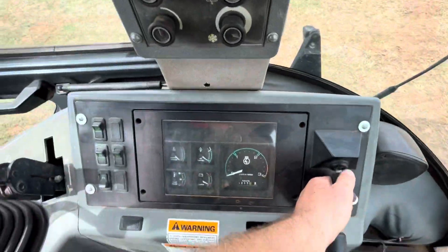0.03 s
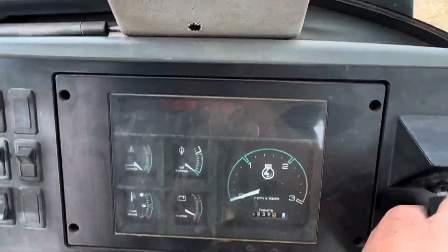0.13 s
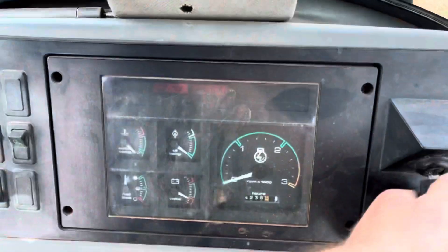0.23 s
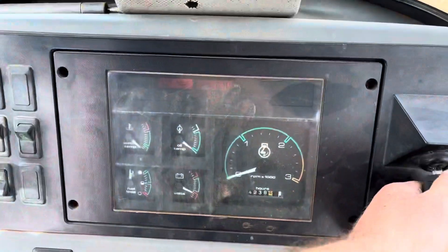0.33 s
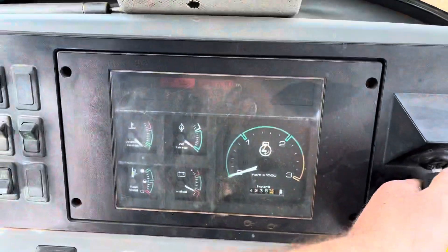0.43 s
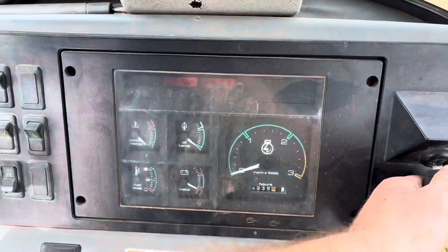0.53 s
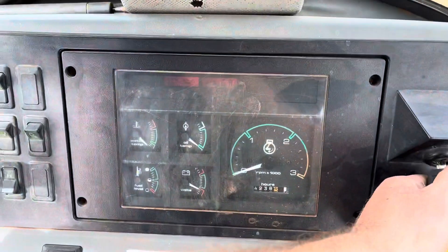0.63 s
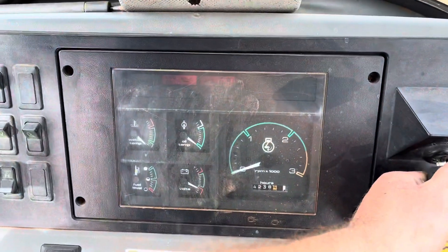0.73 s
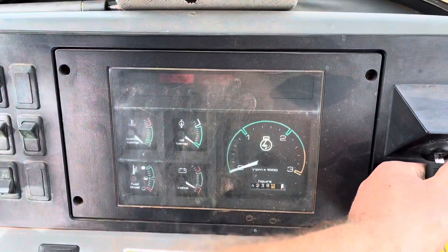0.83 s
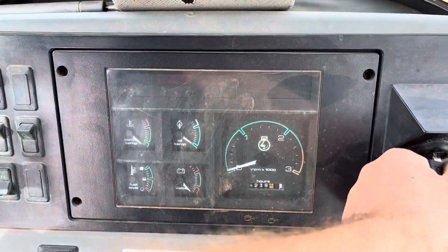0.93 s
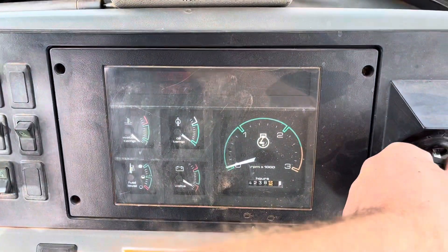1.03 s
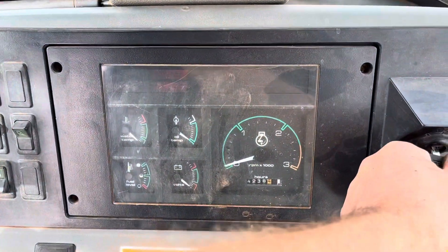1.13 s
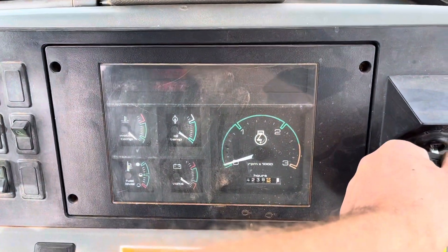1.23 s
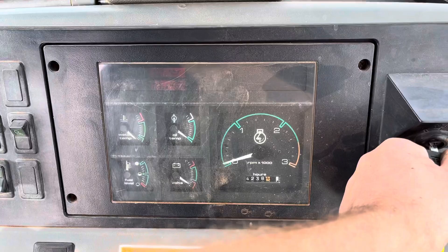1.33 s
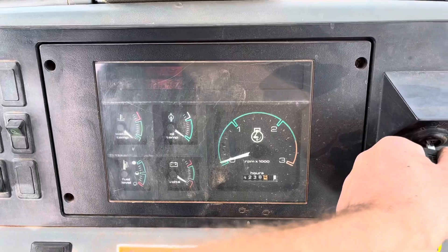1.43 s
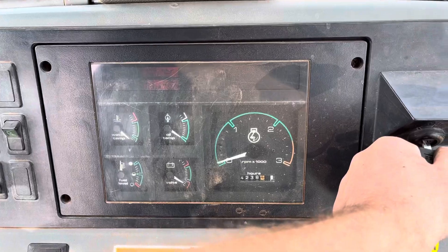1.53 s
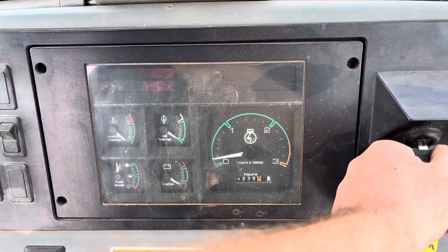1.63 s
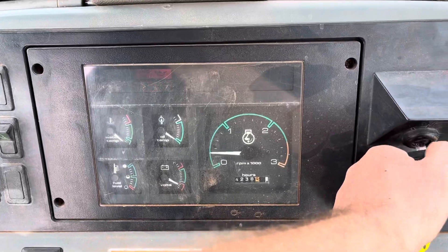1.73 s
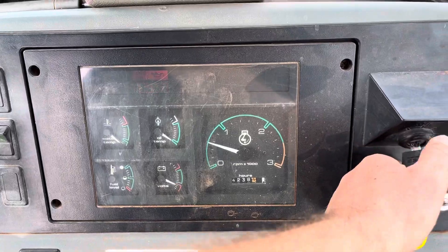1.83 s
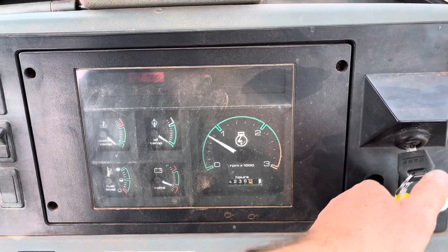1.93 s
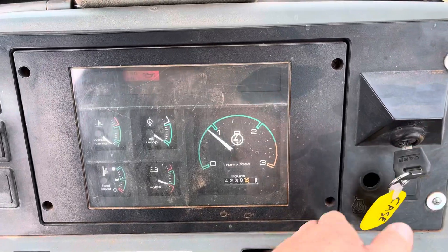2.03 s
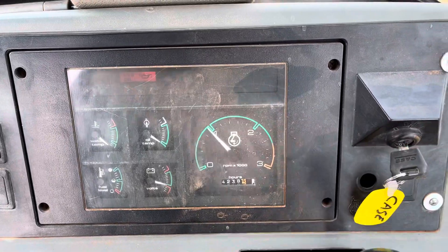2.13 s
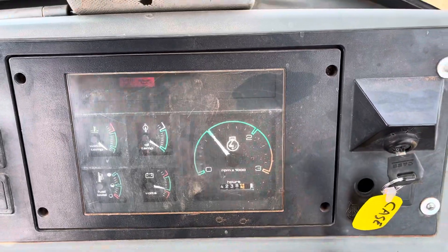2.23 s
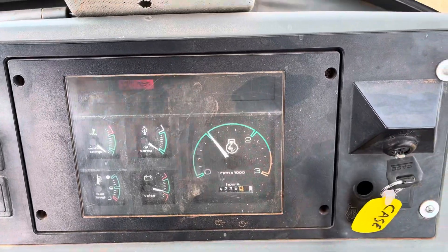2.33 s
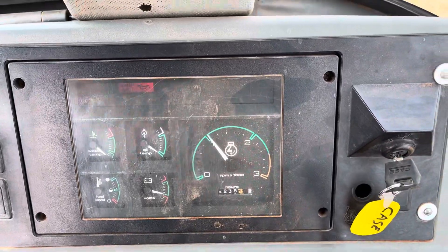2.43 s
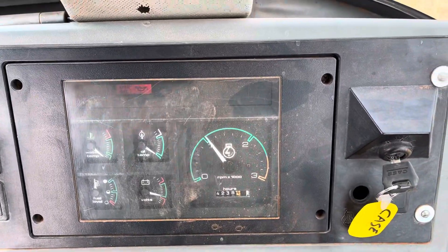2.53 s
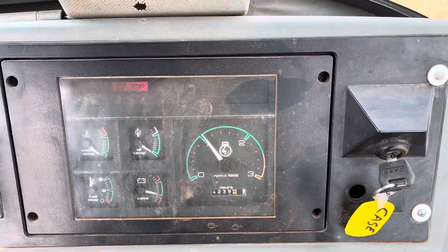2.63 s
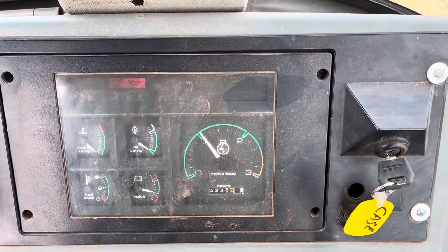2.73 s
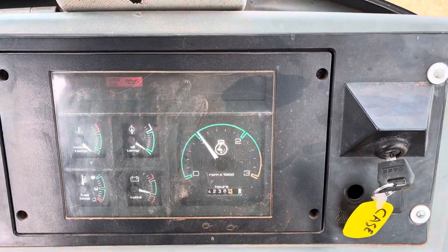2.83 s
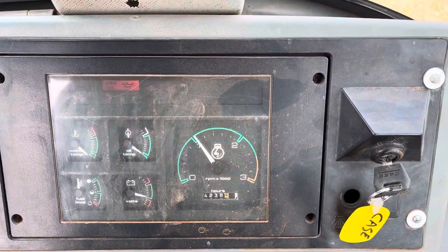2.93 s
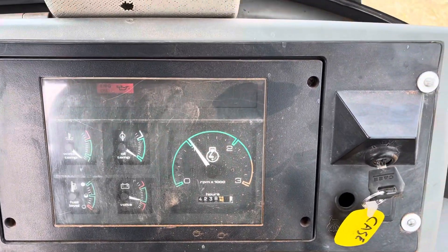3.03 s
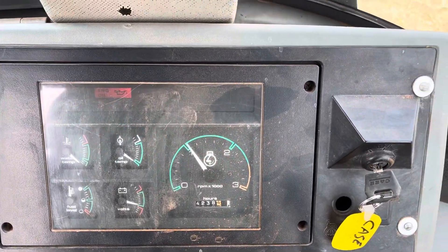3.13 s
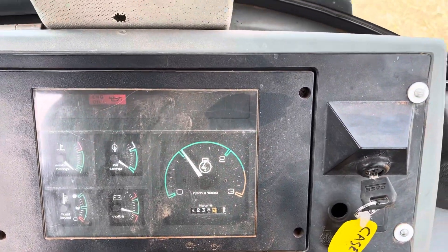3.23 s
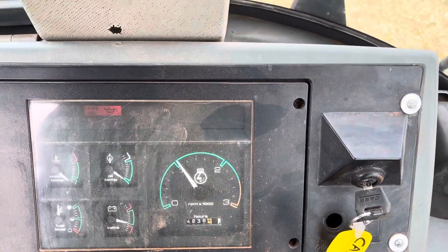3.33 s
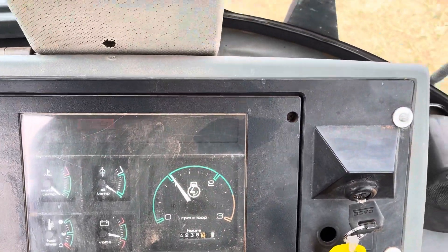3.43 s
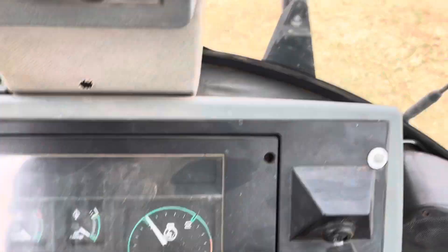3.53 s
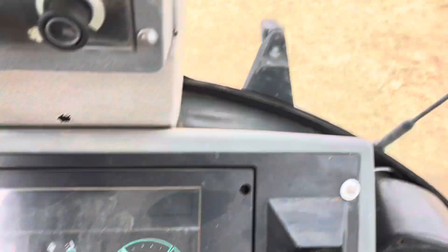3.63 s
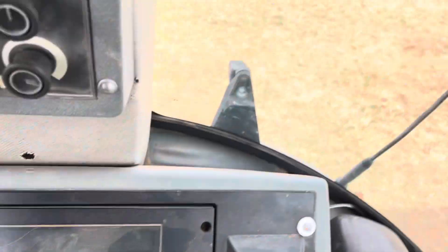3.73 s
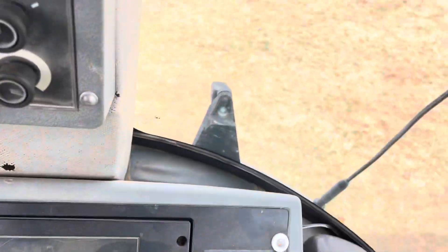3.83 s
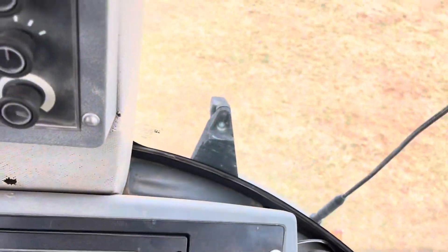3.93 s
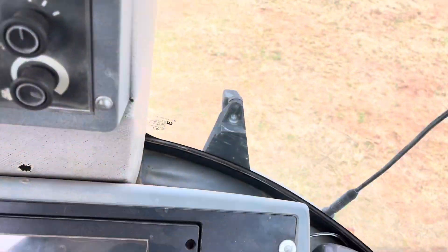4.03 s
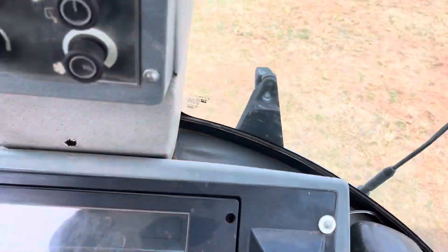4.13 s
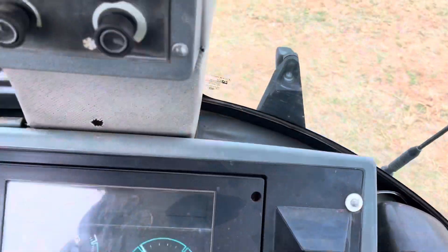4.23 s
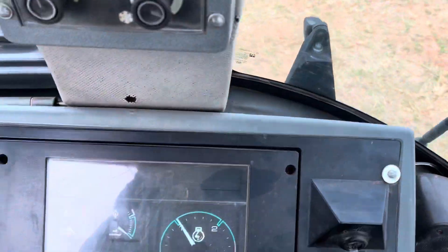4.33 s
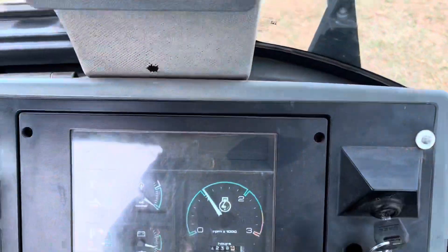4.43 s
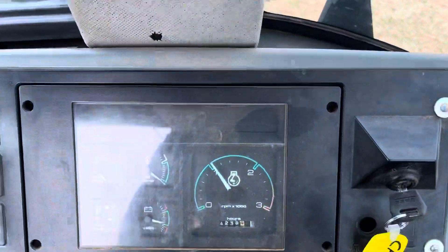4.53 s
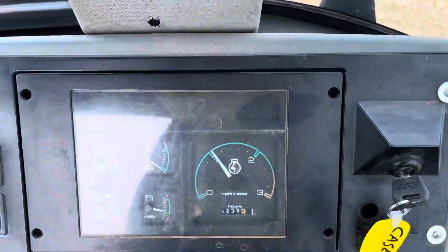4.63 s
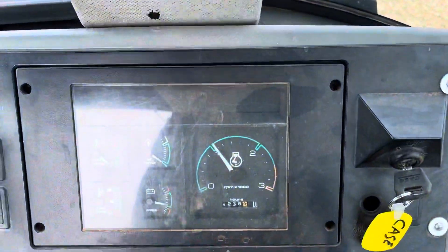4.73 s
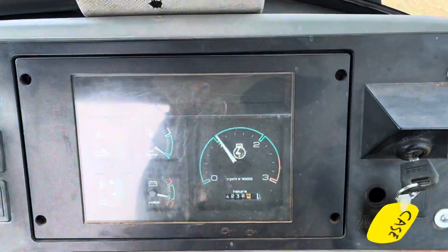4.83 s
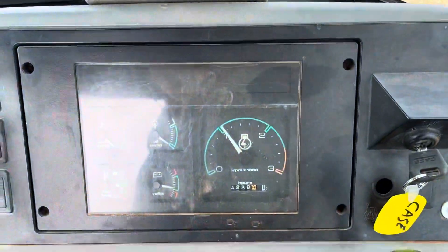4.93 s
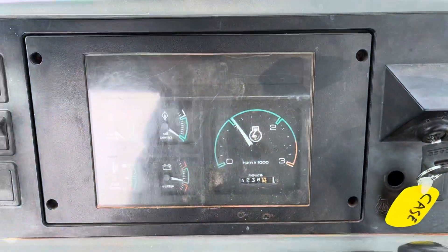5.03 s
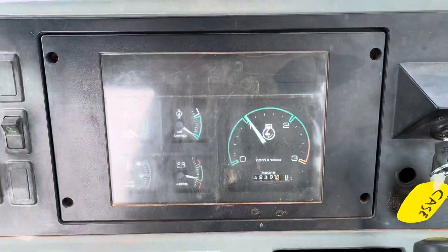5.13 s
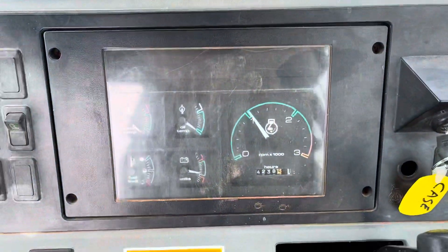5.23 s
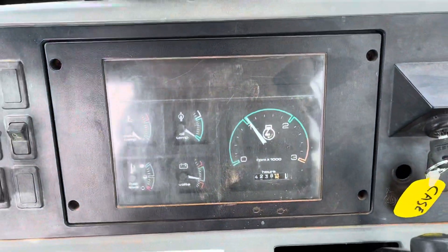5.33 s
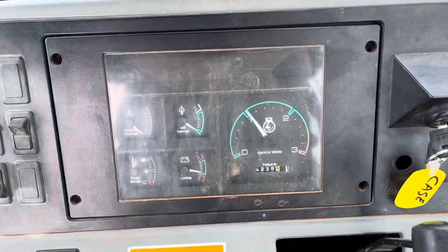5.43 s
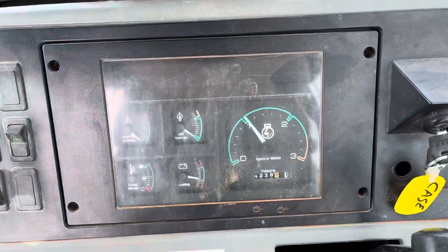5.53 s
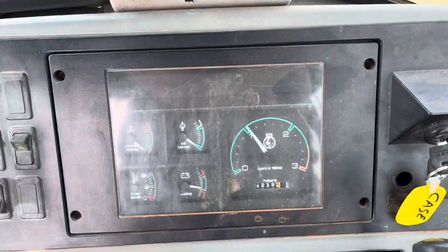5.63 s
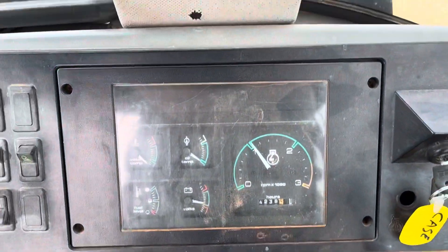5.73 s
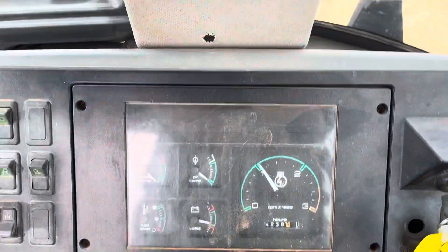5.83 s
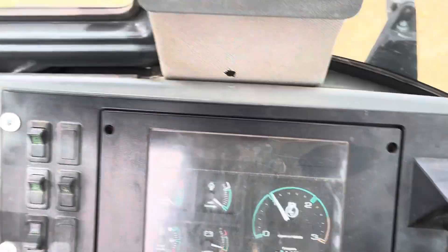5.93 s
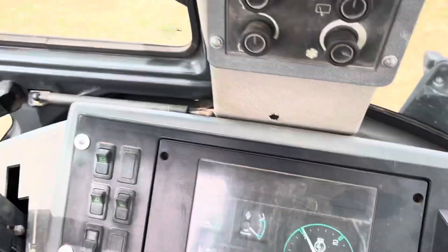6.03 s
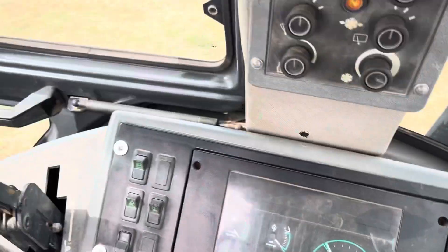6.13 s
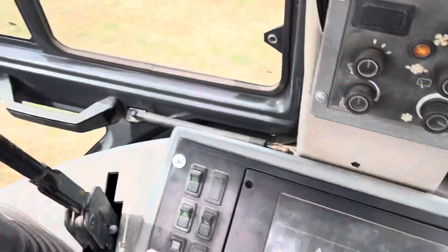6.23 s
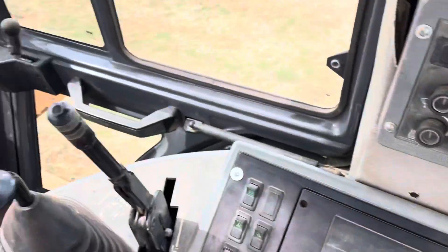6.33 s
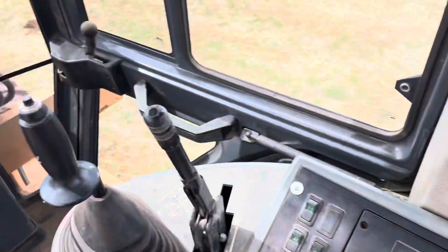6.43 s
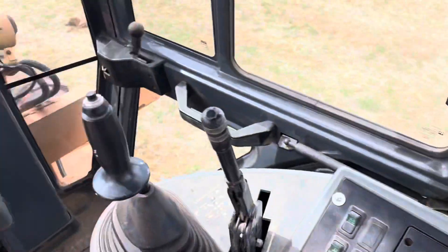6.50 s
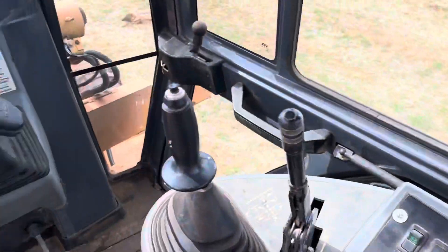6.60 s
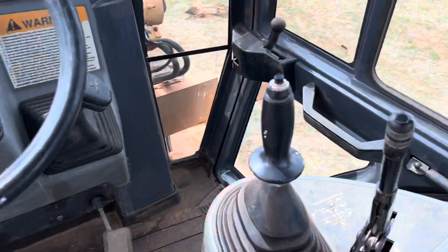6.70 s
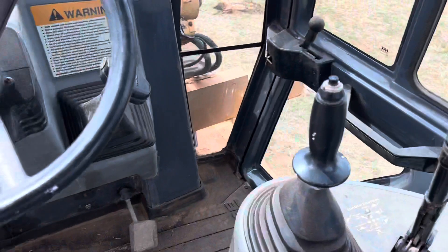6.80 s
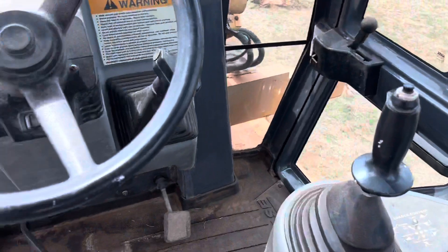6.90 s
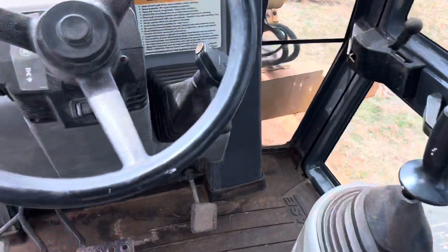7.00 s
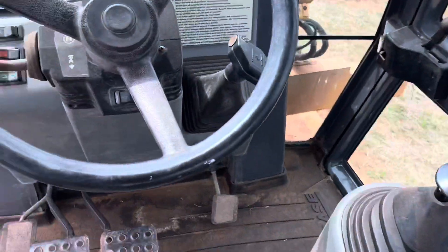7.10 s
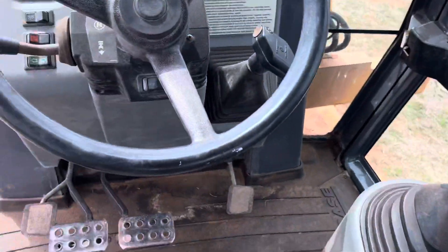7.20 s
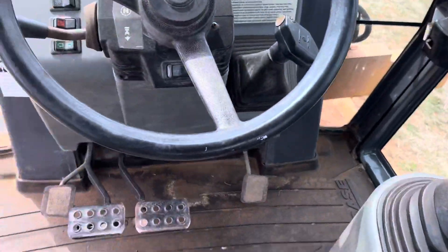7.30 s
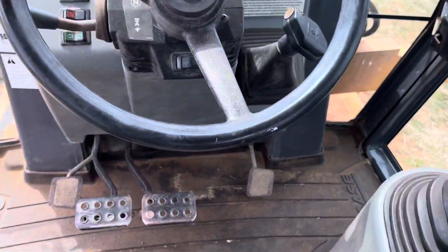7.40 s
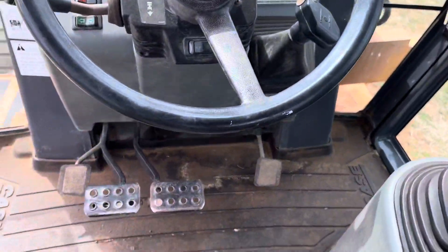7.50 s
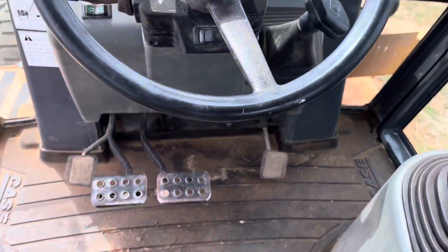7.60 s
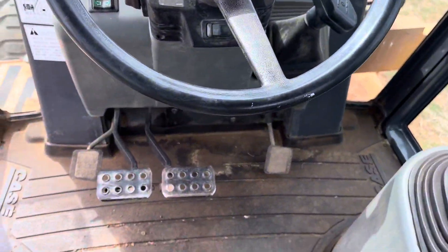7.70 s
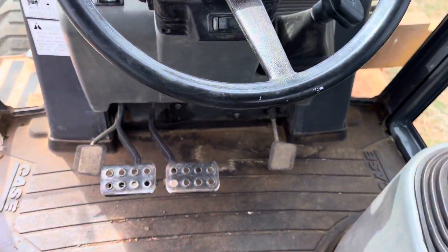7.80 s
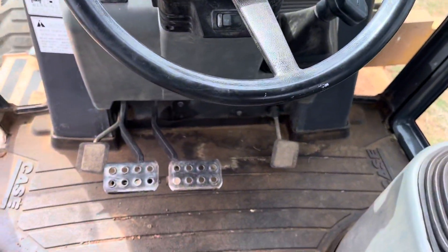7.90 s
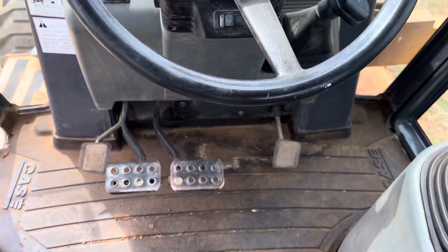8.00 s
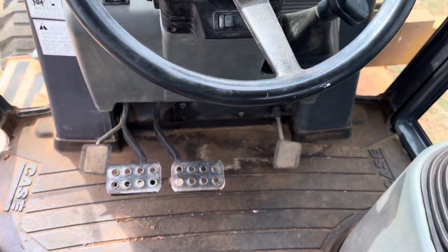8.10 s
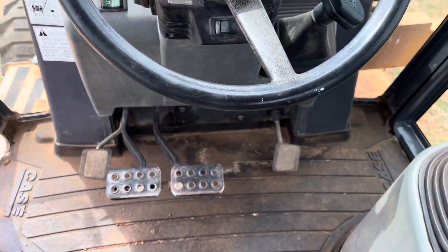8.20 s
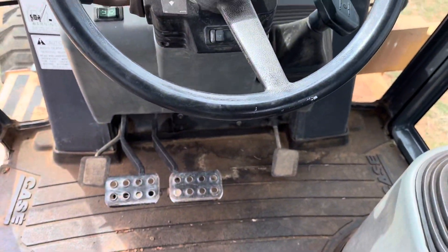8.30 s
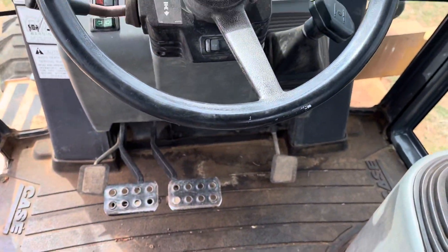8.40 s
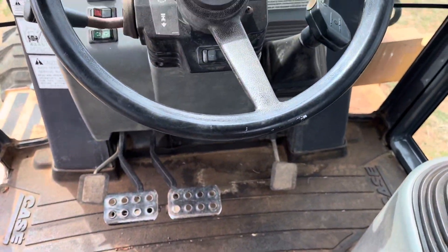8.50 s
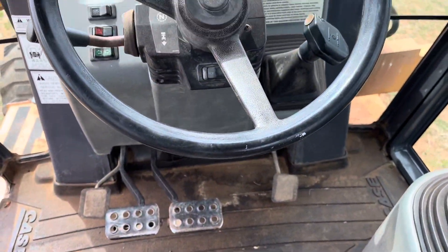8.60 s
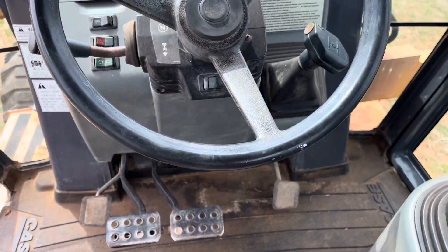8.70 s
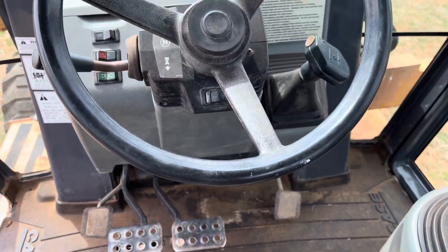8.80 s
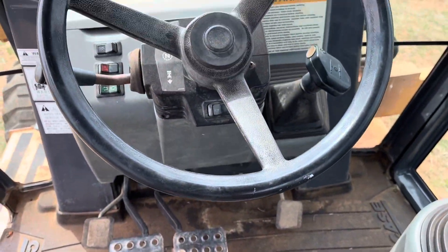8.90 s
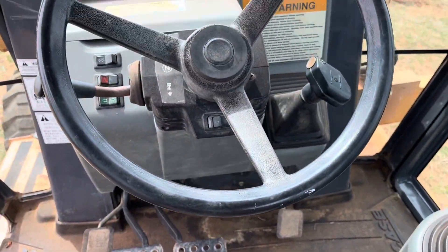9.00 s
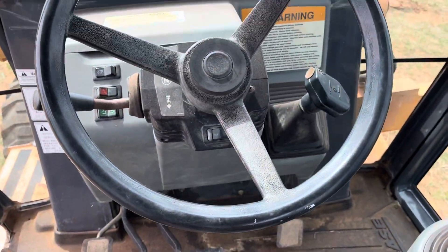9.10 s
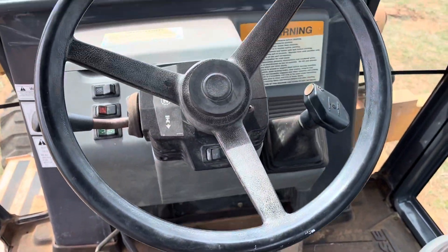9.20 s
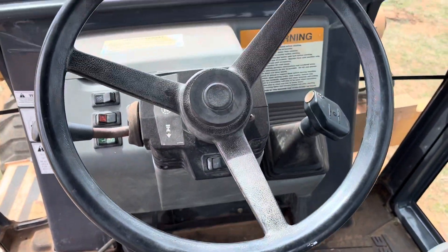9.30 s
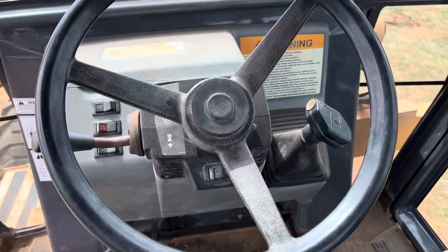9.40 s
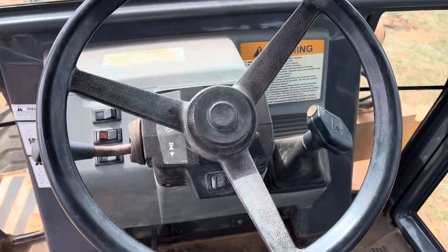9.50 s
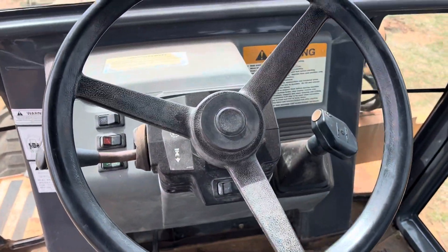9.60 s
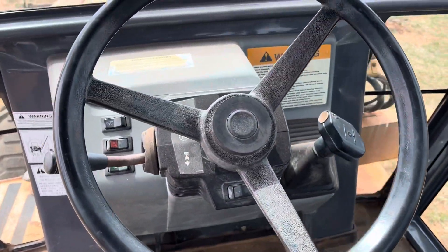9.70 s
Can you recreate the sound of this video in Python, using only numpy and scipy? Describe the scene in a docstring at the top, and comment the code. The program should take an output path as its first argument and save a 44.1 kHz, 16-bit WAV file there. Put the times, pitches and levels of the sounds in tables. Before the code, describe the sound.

Inside a steel machine cab, faint murmur, clothes rustle and low wind come first. A key ticks, and the starter whines and grinds in short sagging strokes. The diesel catches with rough knocks, flares slightly and settles into a throbbing, booming idle. Loose metal rings in a short flurry of knocks. A thin high squeak flickers above. The handheld stereo microphone turns toward floor and wheel, changing the engine's colour as dull wind slaps hit it.

```python
"""Inside the steel cab of a backhoe loader. First a distant murmur, rustling clothes and low wind rumble, all
coloured noise. The key ticks, then the starter grinds and whines over three compressions. The four-cylinder diesel
catches, overshoots and settles: tones on its firing rate, throbbing noise and ringing panels, with a high squeak.
Loose metal clatters in one spell of ringing knocks. Last, the hand-held microphone turns from the dashboard to the
floor, then the steering wheel: the engine's colour changes, and wind slaps the microphone as short low waves."""
import sys
import numpy as np
from scipy import signal
from scipy.fft import rfft, irfft, next_fast_len
from scipy.io import wavfile

SR = 44100
rng = np.random.default_rng(int(sys.argv[2]) if len(sys.argv) > 2 else 0)


def int16_out(signal):
    """Quantize to a 16-bit WAV file."""
    q = np.round(np.clip(np.atleast_2d(signal).T, -1, 1) * 32767)
    wavfile.write(sys.argv[1], SR, q.astype(np.int16))


N = 429975

# Surroundings: start_s, machinery_db, rustle_db
YARD = [(0.0, -30, -41), (.15, -31, -38.5), (.18, -31.5, -50), (0.32, -31.5, -50), (1.0, -31, -54),
        (1.3, -34.5, -45), (1.6, -37.5, -41)]
# Colour of the murmur, for the part alike at both ports (mid) and the opposed part (side): pitch_hz, relative_db
YARD_MID = [(88, -34), (150, 0.5), (178, -20), (416, -10), (505, -16.5), (624, -8), (787, -15.5),
            (1510, -19), (1670, -27), (6180, -39), (7940, -107), (9450, -84.5), (15000, -49.5)]
YARD_SIDE = [(88, -25.5), (150, -7.5), (248, -12), (294, -13.5), (1350, -14.5), (1510, -12), (1700, -23),
             (1950, -21), (11500, -56), (15000, -72.5)]

# Strength of the wind rumble: time_s, level_db
WIND = [(0.0, -26), (.09, -20), (.125, -22), (.15, -17), (.22, -24), (.255, -19), (.31, -17), (.34, -26),
        (.5, -25.5), (.64, -20.5), (.75, -27.5), (.83, -22), (0.92, -30), (1.3, -33), (1.43, -18.5),
        (1.6, -20), (2.3, -36), (2.58, -47), (2.71, -28.5), (3.28, -29), (3.58, -24), (3.8, -24),
        (4.02, -38), (4.91, -24.5), (6.43, -31), (6.66, -27), (6.72, -23.5), (7.27, -19.5), (7.32, -28),
        (7.5, -26), (7.75, -29), (8.2, -23), (8.42, -21), (8.72, -23.5), (8.85, -20), (9.0, -22.5),
        (9.38, -18.5), (9.45, -24), (9.75, -20)]
# Wind slaps on the microphone: time_s, level_db
GUSTS = [(6.89, -25), (7.25, -17), (7.6, -8.5), (7.829, -18), (8.018, -11.5), (8.267, -5), (8.31, -5),
         (8.333, -2), (8.748, -7), (8.801, -16), (9.35, -16), (9.391, -17)]
# Colour of the wind rumble: pitch_hz, relative_db
WIND_COLOUR = [(12, -54), (20, -24), (54, 1), (123, -8), (252, -14), (331, -26.5), (400, -19.5), (520, -70),
               (880, -120)]
SLAP_HZ = 59.6
WAKE_DB, WAKE_S = -6.5, 0.012  # short rumble left by each slap, relative to the slap

# Brief swells of the treble noise with the starter, the catch and the clatter, and the key tag jingling at
# 2.2-2.4, 6.34 and 8.91 s: start_s, length_s, level_db
HISS_SWELLS = [(0.84, 0.17, -76), (1.15, 0.055, -64), (1.34, .03, -62), (1.64, 0.11, -56),
               (2.215, 0.016, -51), (2.31, 0.11, -53), (3.44, 0.014, -51), (3.51, .03, -60),
               (3.66, 0.22, -49), (3.955, 0.013, -54), (6.34, 0.017, -53), (8.91, 0.025, -54)]
HISS_STILL_DB, HISS_IDLE_DB, HISS_FLOOR_DB = -68, -62.5, -61  # engine off, before the turn, facing the floor

# Knocks of loose metal: time_s, level_db, presence_db and top_db (both relative to level_db), main_ring_hz
CLATTER = [(3.446, -12, -12, -38, 1386), (3.461, -23, -39, -39, 1360), (3.473, -27, -36, -36, 1380),
           (3.519, -36, 1, -7, 1340), (3.659, -34, 3.5, -11, 1320), (3.729, -23, -2, -10, 1330),
           (3.759, -25.5, -1.5, -9, 1380), (3.7974, -15.5, -7.5, -28, 1254), (3.812, -19, -12, -28, 1293),
           (3.834, -18, -10.5, -20, 1275), (3.865, -16, -14, -32, 1250), (3.882, -17.5, -18, -26, 1336),
           (3.9, -20.5, -24, -29, 1050), (3.921, -20.5, -29, -35, 1220), (3.9566, -23.5, -16, -25, 1220),
           (3.973, -21, -17, -30, 1225), (4.0, -36, -18, -28, 1170)]
# Ringing modes of the metal: multiple of the main ring, relative_db, time to fall 60 dB (s)
LOOSE_METAL = [(.36, -6, .12), (.64, -11, .06), (.77, -10, .06), (1.0, 0, .11), (1.06, -8, .06),
               (1.25, -7, .1), (1.31, -10, .06), (1.53, -13, .06), (1.75, -10, .06), (1.86, -8, .06),
               (1.95, -13, .05)]
RING_SPREAD_DB = 2.0  # chance in the strength of each mode

# Key and solenoid ticks: time_s, tick_db, treble_db
KEY = [(0.822, -44, -45.5), (0.8599, -35.5, -55)]

# Starter strokes, one per compression: start_s, length_s, grind_db, whine_db, groan_db, whine_hz at the start,
# whine sag (Hz per s)
STROKES = [(0.898, 0.16, -38, -35.5, -28.5, 977, 1397), (1.134, 0.11, -32, -29.5, -32.5, 1296, 3630),
           (1.337, 0.015, -28.5, -35, -33, 1180, 1510)]
# Resonances of the starter's body: pitch_hz, width_hz, relative_db
STARTER_BODY = [(437, 31, 5), (604, 20, 2), (890, 75, 1), (1140, 15, 4), (1800, 60, -8), (2430, 46, -20),
                (2980, 150, -30), (4640, 76, -35), (5280, 49, -10)]
# Singing of the ring gear: start_s, length_s, level_db
GEAR = [(0.86, 0.036, -37), (0.942, 0.025, -29.5), (0.993, 0.022, -28.5), (1.03, 0.013, -34),
        (1.122, 0.031, -26.5), (1.21, 0.018, -27.5), (1.326, 0.0092, -25)]
GEAR_HZ, GEAR_SAG_HZ_PER_S, GEAR_RING_S = 2490, 1300, 0.014
ENGAGE_S, ENGAGE_DB, ENGAGE_T60_S = 0.862, -30, .25  # the pinion slams into the ring gear
GRIND_SWELL_DB, WHINE_SWELL_DB, LET_GO_S = 0.5, 7.5, 0.023
GROAN_HZ, GROAN_SWELL_DB = 602, 21  # the starter housing groans under load

# Cab plates: pitch_hz, wander_per_s, steady part (ratio), early_idle_db, before_turn_db, floor_db, wheel_db
PLATES = [(626, 66, 0.1, -30, -36, -45, -45), (386.6, 14, .3, -48, -44, -43, -45),
          (449.6, 8.1, .3, -37.5, -50.5, -47, -47), (538, 16, 2.2, -60, -48, -38, -33)]

# Firing rate as it climbs, overshoots and settles: time_s, firings_per_s
SPEED = [(1.619, 31.3), (1.75, 33.4), (1.95, 34.2), (2.12, 35.3), (3.0, 34.9), (4.0, 34.6), (5.4, 34.35),
         (6.4, 34.4), (7.3, 34.75), (9.75, 34.7)]
# Noise of the engine from its first firings: time_s, roar_db, knock_db
ROAR = [(1.38, -30, -44), (1.4, -37, -53), (1.478, -43, -38), (1.5, -33.5, -52), (1.66, -22.5, -27),
        (1.674, -18, -30), (1.866, -24.5, -34), (2.32, -26, -39), (3.4, -25.5, -37.5), (3.85, -25, -32),
        (4.5, -26.5, -42.5), (6.2, -26.5, -41.5), (7, -26.5, -30.5), (8.2, -27, -28.5), (9.75, -25.5, -33)]
# Turn of the microphone: time_s, share of the floor-facing colour (0-1)
TURN = [(1.35, 0.41), (6.201, 0.36), (6.899, 0.62), (9.75, 0.68)]
FACING_S = [6.2, 7.2, 8.3, 9.3]  # leaves the dashboard, reaches the floor, leaves it, reaches the wheel
# Roar colours facing the dashboard and the floor, alike (mid) and opposed (side): pitch_hz, relative_db
DASH_MID = [(35, -35), (60, -13), (97, -11), (174, -11.5), (309, -20.5), (347, -15.5), (551, -12),
            (762, -18), (1180, -16.5), (1600, -33), (1680, -25.5), (2200, -31.5), (2600, -28), (5060, -40),
            (7330, -47.5), (8230, -99), (9900, -71.5), (13700, -59), (15000, -78)]
DASH_SIDE = [(35, -41), (60, -10), (138, -12.5), (170, -2), (309, -26), (564, -10.5), (1330, -22),
             (1710, -22.5), (9230, -50), (10900, -69.5), (11900, -86), (13700, -57), (15000, -59.5)]
FLOOR_MID = [(35, -30), (60, -8.5), (295, -18.5), (381, -13.5), (418, -24.5), (539, -17.5), (1080, -20),
             (1590, -20.5), (1670, -35.5), (1800, -26), (6230, -44.5), (7500, -53.5), (8230, -101),
             (9670, -53.5), (13400, -49.5), (15000, -81)]
FLOOR_SIDE = [(35, -49), (60, -4), (178, -1.5), (229, -14.5), (381, -9), (1130, -8.5), (1360, -5),
              (1880, -19), (9450, -39), (10900, -53), (11600, -100), (13100, -44), (15000, -47)]
DASH_SIDE_DB, FLOOR_SIDE_DB = -2, 0
PATCHY_DB, PATCHES_PER_S = 2.2, 7  # each band of the roar swells and sinks on its own
# Resonances of engine block and cab panels: pitch_hz, width_hz, dashboard_db, floor_db, wheel_db (all relative)
BLOCK = [(650.5, 3.7, 22, 15.5, 8), (990, 13, -14, -13, -17), (1115, 7.2, -9, -21, 17.5),
         (1230, 9.2, -7, -1, -5), (1293, 6.7, 26.5, -1, 20.5), (1310, 7, 2, 19.5, 17),
         (1390, 11, -15, -8, -3), (1495, 7.4, -11, 3, -1), (1604, 5.3, -15.5, 15.5, 8),
         (1900, 8, -3.5, -16, -15), (1940, 6.6, 6, -11, -18.5), (2464, 35, -0.5, -8, -15),
         (2457, 28, 10.5, -8.5, -0.5), (2650, 30, 2.5, -15, -22), (2900, 14, 10, -3, -3),
         (3000, 19, -5, 2, -4), (2970, 20, -22, -37, -28), (3300, 16, -17.5, -20, -24),
         (5000, 29, -21.5, -21, -21)]
# Short knocking bursts as the engine catches, with two faint ones at idle: time_s, level_db
SHORT_KNOCKS = [(1.64, -19.5), (1.675, -23), (1.69, -30), (1.719, -29), (1.747, -27), (1.929, -22),
                (2.829, -31), (3.149, -36)]
# Resonances of the short knocks: pitch_hz, width_hz, relative_db
SHORT_KNOCK_BODY = [(450, 90, 0.5), (610, 90, 0), (1000, 110, 1.5), (1260, 170, 1), (2450, 300, -5),
                    (3000, 400, -14)]
SHORT_KNOCK_T60_S = .05
# Spells of high squeaking: start_s, length_s, level_db, pitch_hz
SQUEAKS = [(1.68, .015, -43, 13000), (1.733, .025, -43, 13030), (1.798, 0.023, -41, 13500),
           (1.86, 0.017, -47, 13100), (4.18, 0.11, -54, 13240), (4.83, 1.34, -54, 13650),
           (6.16, 0.24, -61, 13460), (6.89, 0.071, -61, 13600), (7.81, 0.057, -62, 13600),
           (8.01, .15, -61, 13500), (8.46, 0.3, -59, 13700), (8.9, .8, -60, 13540)]
SQUEAK_REST_DB = -80
# Firing harmonics, fan and belt-driven parts: multiple of the firing rate, early_idle_db, before_turn_db,
# floor_db, extra_db while the engine flares
TONES = [(1, -19, -20.5, -21, -2), (1.58, -31, -36, -29, 0), (2, -20, -25, -25, -1),
         (2.35, -26, -29.5, -38.5, 2), (2.75, -25, -55, -31, -8), (3, -23, -29.5, -27.5, -5),
         (3.79, -22, -29, -34, 2.5), (4.0, -32.5, -37.5, -38.5, 5), (4.27, -38.5, -30.5, -41.5, 16),
         (6, -32, -34, -36, -10), (7.0, -43.5, -42, -36, -6), (11.0, -56.5, -42, -42.5, -10),
         (13.0, -51.5, -40, -54, -1), (10.0, -43, -45.5, -50, 3), (14.0, -49, -43, -54, 0.5),
         (16.0, -45, -44, -48.5, 4), (19.0, -43.5, -41, -43, 0.5)]
# Fifth harmonic booming in the cab: time_s, level_db, left-right lean of the low tones (dB, scaled per tone)
BOOM = [(1.62, -40, -5), (1.84, -17.5, -5), (2.16, -22, -4), (3.1, -24.5, -5.5), (3.9, -16.5, -5.5),
        (5.2, -22, -8), (6.45, -20.5, -9), (6.75, -27.5, -6), (7.1, -31.5, -3.5), (9.75, -34, -5)]
FLARE_S, FLARE_RISE_S, FLARE_FALL_S, COME_IN_S = 2, 0.071, 0.12, 0.056

PORT_LAG = 19  # samples by which sound reaches the left port first
CUTOFF_HZ = 15200


def from_db(db):
    """Turn decibels into a plain factor."""
    return np.exp(np.log(10) / 20 * np.asarray(db))


def rms_one(x):
    """Scale x to an average strength (rms) of 1."""
    return x / np.sqrt(np.mean(x ** 2) + 1e-20)


def in_time(rows, fade=0.0047):
    """Columns at every sample, and a gate that is open only within the table's span."""
    s, *columns = np.transpose(rows)
    t = np.arange(N) / SR
    gate = np.clip(np.minimum(t - s[0], s[-1] + fade - t) / fade, 0, 1)
    return [np.interp(t, s, c) for c in columns], gate


def colour(x, spectrum):
    """Filter x by a curve of (Hz, dB) points; rms 1."""
    hz, db = np.transpose(spectrum)
    size = next_fast_len(N)
    log_hz = np.log(np.arange(size // 2 + 1) * SR / size + 1)
    gain = from_db(np.interp(log_hz, np.log(hz), db))
    return rms_one(irfft(rfft(x, size) * gain, size)[:N])


def drift(rate):
    """Slow random wandering, spread 1; a higher rate wanders faster."""
    # made at every 40th sample, then joined by straight lines
    r = np.exp(-80 * np.pi * rate / SR)
    slow = signal.lfilter([1], [1, -2 * r, r * r], rng.standard_normal(N // 40 + 2002))[2000:]
    return np.interp(np.arange(N) / 40, np.arange(len(slow)), rms_one(slow))


def resonate(x, hz, width_hz):
    """One resonance: x makes it ring at hz, longer when the width is small."""
    r = np.exp(-np.pi * width_hz / SR)
    feedback = [1, -2 * r * np.cos(2 * np.pi * hz / SR), r * r]
    return signal.lfilter([(1 - r * r) / 2, 0, (r * r - 1) / 2], feedback, x + 1e-18)


def body(x, peaks):
    """Side-by-side resonances with alternating signs; rms 1."""
    return rms_one(sum((-1) ** k * from_db(db) * resonate(x, hz, w) for k, (hz, w, db) in enumerate(peaks)))


def band(x, low_hz, high_hz):
    """Keep only the sound between two pitches."""
    return signal.sosfilt(signal.butter(4, [low_hz, high_hz], "band", fs=SR, output="sos"), x)


def bursts(times, db, t60):
    """An envelope that jumps at each time and falls 60 dB in t60 seconds."""
    clicks = np.zeros(N)
    clicks[(np.asarray(times) * SR).astype(int)] = from_db(db)
    return signal.lfilter([1], [1, -from_db(-60 / (t60 * SR))], clicks + 1e-18)


def bouts(rows, attack, release, swell_db=0):
    """Envelope of (start, length, dB) rows: attack, a hold that swells by swell_db up to its dB, release."""
    out = np.zeros(N)
    for s, length, db, *_ in rows:
        first = int(s * SR)
        t = np.arange(min(int((length + 9 * release) * SR), N - first)) / SR
        hold = from_db(db - swell_db * np.clip(1 - t / length, 0, 1)) * np.clip(t / attack, 0, 1)
        out[first:first + len(t)] += hold * np.exp(-np.clip(t - length, 0, None) / release)
    return out


def glide(starts, start_hz, sag):
    """A pitch set anew at each start, sagging for at most 0.12 s and then holding."""
    t = np.arange(N) / SR
    k = np.clip(np.searchsorted(starts, t) - 1, 0, None)
    return start_hz[k] - sag[k] * np.clip(t - starts[k], 0, .12)


def rough_tone(hz, wander, steady=0):
    """A tone whose phase and strength wander at random around a steady part; rms 1."""
    phase = 2 * np.pi * np.cumsum(hz) / SR
    return rms_one((steady + drift(wander)) * np.sin(phase) + drift(wander) * np.cos(phase))


def stereo(mid, side):
    """Left and right from a shared part and an opposed part."""
    return np.array([mid + side, mid - side])


def port_noise(own, lag=PORT_LAG):
    """Noise at two microphone ports: a common part, late on the right, and a part of each port's own."""
    common, left, right = rng.standard_normal((3, N))
    return np.array([common + own * left, np.roll(common, lag) + own * right]) / np.sqrt(1 + own ** 2)


def wide_noise(mid_spectrum, side_spectrum, side_db, throb=1, own=1.6, lag=PORT_LAG):
    """Port noise whose common and opposed parts have a colour each."""
    left, right = port_noise(own, lag) * throb
    return stereo(colour(left + right, mid_spectrum), from_db(side_db) * colour(left - right, side_spectrum))


def treble(opposed):
    """Thin top noise: the highest band is alike at both ports, the band below it is opposed."""
    high, lower = rng.standard_normal((2, N))
    high = rms_one(band(high, 9750, 13300))
    return stereo(high, opposed * rms_one(band(lower, 4500, 10400)))


def patchy(x):
    """Cut x into half-octave bands and let each waver in level."""
    edges = 300 * 2 ** np.arange(0, 4.6, .5)
    lows = [signal.sosfiltfilt(signal.butter(2, hz, fs=SR, output="sos"), x) for hz in edges]
    # the difference of two neighbouring low-passes is one band
    middle = sum(from_db(PATCHY_DB * drift(PATCHES_PER_S)) * (b - a) for a, b in zip(lows, lows[1:]))
    return lows[0] + middle + x - lows[-1]


def yard():
    """Murmur of distant machinery as coloured noise, and clothes rustling as mid-high noise at the start."""
    (level_db, rustle_db), before = in_time(YARD)
    rustle = before * from_db(rustle_db) * rms_one(band(port_noise(0.71), 1460, 4500))
    return from_db(level_db) * wide_noise(YARD_MID, YARD_SIDE, -3.0) + rustle


def wind():
    """Air buffeting the microphone ports: lumpy low noise, with slaps late on as very short low waves."""
    (level_db,), _ = in_time(WIND)
    rumble = wide_noise(WIND_COLOUR, WIND_COLOUR, -12.0, from_db(2.1 * drift(7.9)), own=0.44)
    flutter = rms_one(band(rng.standard_normal(N), 110, 480))
    slaps = np.zeros(N)
    for s, db in GUSTS:
        t = np.arange(N) / SR - s - .006
        wave = np.sin(2 * np.pi * SLAP_HZ * t) + 0.24 * flutter
        slaps += from_db(db) * wave * np.exp(-(t * SLAP_HZ * 1.45) ** 2)
    wakes = bouts([(s, WAKE_S / 2, db + WAKE_DB) for s, db in GUSTS], WAKE_S / 2, WAKE_S)
    return (from_db(level_db) + wakes) * rumble + slaps


def hiss():
    """Air and belt hiss: flickering treble noise, with brief swells as the engine starts and the metal
    clatters, and as the key tag jingles."""
    stages = [ROAR[0][0], SPEED[0][0], TURN[1][0], TURN[2][0]]
    levels = [HISS_STILL_DB, HISS_IDLE_DB, HISS_IDLE_DB, HISS_FLOOR_DB]
    steady = from_db(np.interp(np.arange(N) / SR, stages, levels))
    swells = bouts(HISS_SWELLS, 0.0065, 0.013, swell_db=2)
    return (steady + swells) * from_db(2.2 * drift(10)) * treble(1.0)


def clatter():
    """Each knock of loose metal rings its modes, with chance in their strength and phase, and sprays noise."""
    s, db, presence_db, top_db, pitch = np.transpose(CLATTER)
    multiple, mode_db, t60 = np.array(LOOSE_METAL).T[..., None]
    t = np.arange(SR // 4) / SR
    rings = np.zeros((2, N))
    chances = rng.standard_normal((len(s), 2, len(t60), 1))
    for when, level_db, hz, chance in zip(s, db, pitch, chances):
        height = from_db(level_db + mode_db + RING_SPREAD_DB * chance[0] - 60 * t / t60)
        height = height * np.minimum(t / 0.0013, 1)  # soft start
        for side, sign in enumerate([1, -1]):
            modes = height * np.sin(2 * np.pi * hz * multiple * t + sign * 0.43 * chance[1])
            rings[side, int(when * SR):][:len(t)] += np.sum(modes, axis=0)
    rattle = port_noise(3.5, lag=0)
    clack = bursts(s, db - 11.5, 0.3) * rms_one(band(rattle, 830, 1700))
    clack += bursts(s, db - 13, .07) * rms_one(band(rattle, 300, 2600))
    presence = bursts(s, db + presence_db, 0.2) * rms_one(band(rattle, 1930, 5530))
    top = bursts(s, db + top_db, 0.065) * treble(1.6)
    return rings * from_db(1.5 * drift(83)) + clack + presence + top


def key():
    """Key and solenoid clicks: bursts of bright noise that jump up and die away."""
    s, db, top_db = np.transpose(KEY)
    tick = bursts(s, db, 0.22) * rms_one(band(port_noise(0.4), 2500, 6060))
    return tick + bursts(s, top_db, .2) * treble(0.98)


def starter_grind():
    """Meshing teeth: rough noise through the starter's resonances, with a slam as the pinion engages."""
    teeth = port_noise(1.0) * from_db(1.3 * drift(65))
    grind = body(band(teeth, 380, 6200), STARTER_BODY) + 0.6 * rms_one(band(teeth, 650, 3250))
    strokes = bouts(STROKES, 0.01, LET_GO_S, GRIND_SWELL_DB)
    return grind * (strokes + bursts([ENGAGE_S], ENGAGE_DB, ENGAGE_T60_S))


def starter_whine():
    """The motor's rough tones sag against each compression while the housing groans at a fixed pitch."""
    s, length, _, whine_db, groan_db, start_hz, sag = np.transpose(STROKES)
    hz = glide(s, start_hz, sag)
    whine = rough_tone(hz, 45, 1.0) + .6 * rough_tone(hz, 200) + .4 * rough_tone(1.6 * hz, 150)
    whine = bouts(zip(s, length, whine_db), .012, LET_GO_S, WHINE_SWELL_DB) * stereo(whine, 0.34 * whine)
    groan = rough_tone(np.full(N, GROAN_HZ), 27, 1.2)
    return whine + bouts(zip(s, length, groan_db), .012, LET_GO_S, GROAN_SWELL_DB) * groan


def ring_gear():
    """The struck gear sings: a sagging sine and a rough tone just above it, late on the right."""
    starts = np.transpose(GEAR)[0]
    hz = glide(starts, np.full(len(GEAR), GEAR_HZ), np.full(len(GEAR), GEAR_SAG_HZ_PER_S))
    tone = 0.98 * np.sin(2 * np.pi * np.cumsum(hz) / SR) + 0.5 * rough_tone(1.02 * hz, 150)
    gear = bouts(GEAR, 0.003, GEAR_RING_S) * tone
    return np.array([gear, np.roll(gear, PORT_LAG)])


def starter():
    """The electric motor cranks the engine: its gear sings, its motor whines and its teeth grind."""
    return ring_gear() + starter_whine() + starter_grind()


def plates():
    """Cab plates hum at their own pitches, as wandering tones, while the engine runs."""
    running = in_time(SPEED)[1]
    t = np.arange(N) / SR
    stages = [SPEED[0][0], TURN[1][0], TURN[2][0], FACING_S[3]]
    hum = 0
    for hz, wander, steady, *db in PLATES:
        hum = hum + from_db(np.interp(t, stages, db)) * rough_tone(np.full(N, hz), wander, steady)
    return running * hum


def low_tones(turns):
    """Sines on multiples of the firing rate come in at the catch, flare, settle and change with the turn."""
    t = np.arange(N) / SR
    (boom_db, pan_db), _ = in_time(BOOM)
    flare = bouts([(FLARE_S, FLARE_RISE_S, 0)], FLARE_RISE_S, FLARE_FALL_S)
    stages = [SPEED[0][0], TURN[1][0], TURN[2][0]]
    come_in = np.clip((t - stages[0]) / COME_IN_S, 0, 1)
    tones = [(5, boom_db)]
    tones += [(k, np.interp(t, stages, db) + extra_db * flare) for k, *db, extra_db in TONES]
    out = 0
    for (k, db), start in zip(tones, rng.random(len(tones))):
        lean = np.outer([1, -1], pan_db) * min(0.14 * k, .5)  # the deepest tones fill the cab evenly
        out = out + from_db(db + 0.8 * drift(4.9) + lean) * np.sin(2 * np.pi * (k * turns + start))
    return np.sqrt(2) * come_in * out


def firing_squeak(turns):
    """A high rough tone jumps up a quarter cycle after each firing and dies away; louder in spells."""
    s, _, _, hz = np.transpose(SQUEAKS)
    hz = glide(s, hz, 0 * hz)
    late = (turns - .25) % 1
    squeak = stereo(rough_tone(hz, 220), 0.65 * rough_tone(hz, 220))
    squeak = rms_one(squeak * (0.21 + np.exp(-late / 0.43)) * from_db(2.0 * drift(13)))
    # the negative swell makes each spell start loud and sink
    spells = from_db(SQUEAK_REST_DB) + bouts(SQUEAKS, 0.0057, 0.0079, swell_db=-10.0)
    return spells * squeak


def firing_roar(strength, phase, turned):
    """Coloured noise throbs with each firing; the turn blends the dashboard and floor colours."""
    throb = (1 + .4 * strength * np.exp(-phase / .3)) * from_db(.7 * drift(60))
    dash = wide_noise(DASH_MID, DASH_SIDE, DASH_SIDE_DB, throb)
    floor = wide_noise(FLOOR_MID, FLOOR_SIDE, FLOOR_SIDE_DB, throb, lag=0)
    return patchy(np.sqrt(1 - turned) * dash + np.sqrt(turned) * floor)


def panel_knock(blows):
    """Firing blows ring the block and cab panels; each panel comes and goes on its own as the cab shakes."""
    t = np.arange(N) / SR
    out = 0
    for hz, width_hz, dash_db, floor_db, wheel_db in BLOCK:
        level_db = np.interp(t, FACING_S, [dash_db, floor_db, floor_db, wheel_db])
        out = out + from_db(level_db + 1.5 * drift(9)) * resonate(blows, hz, width_hz)
    return rms_one(out)


def short_knocks(blows):
    """Short knocking bursts at the catch, two faint ones at idle: the blows through broad resonances."""
    s, db = np.transpose(SHORT_KNOCKS)
    return band(bursts(s, db, SHORT_KNOCK_T60_S) * body(blows, SHORT_KNOCK_BODY), 300, 6000)


def engine():
    """Each firing pushes the engine: tones follow the firing rate, and noise roars and knocks in its rhythm."""
    (per_s,), running = in_time(SPEED)
    turns = np.cumsum(per_s) / SR  # firings counted so far
    phase = turns % 1
    (roar_db, knock_db), turning = in_time(ROAR)
    # each firing has a strength of its own
    strength = from_db(rng.normal(0, 1.8, int(turns[-1]) + 1))[turns.astype(int)]
    turned = np.clip(in_time(TURN)[0][0], 0, 1)
    roar = from_db(roar_db) * firing_roar(strength, phase, turned)
    blows = np.sqrt(1 - turned) * port_noise(0.13) + np.sqrt(turned) * port_noise(2.5, lag=0)
    blows = band(blows * strength * np.exp(-phase / .9), 200, 6500)
    knock = from_db(knock_db) * panel_knock(blows)
    tonal = low_tones(turns) + firing_squeak(turns)
    return running * tonal + turning * (roar + knock) + short_knocks(blows)


def scene():
    """All the sounds together, from the background to the engine."""
    return yard() + wind() + hiss() + clatter() + key() + starter() + plates() + engine()


def record(dry):
    """The left port is brighter, the right fuller, rumble under the bass is cut, peaks are rounded, the top is cut."""
    bright = resonate(resonate(dry, 3700, 2500), 3700, 2500) * [[.25], [-.15]]
    full = resonate(dry, 1200, 830) * [[-.12], [.12]]
    x = signal.sosfilt(signal.butter(2, 24, "high", fs=SR, output="sos"), dry + bright + full)
    rounded = 1.238 * np.tanh(x / 1.402)
    return signal.sosfilt(signal.cheby2(12, 70, CUTOFF_HZ, fs=SR, output="sos"), rounded)


dry = scene()
out = record(dry)
int16_out(out)
```